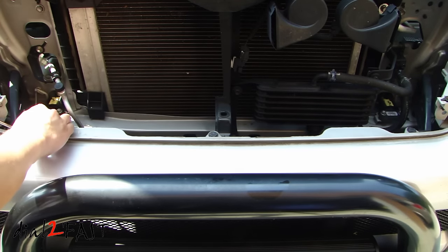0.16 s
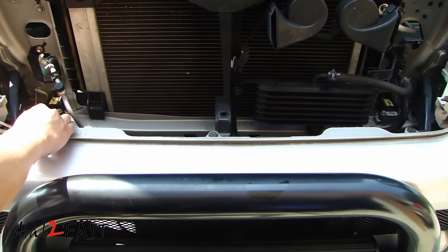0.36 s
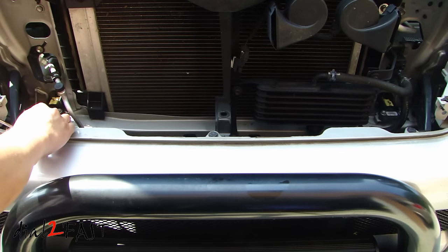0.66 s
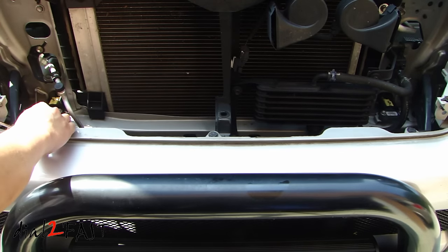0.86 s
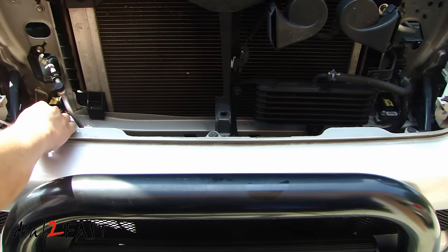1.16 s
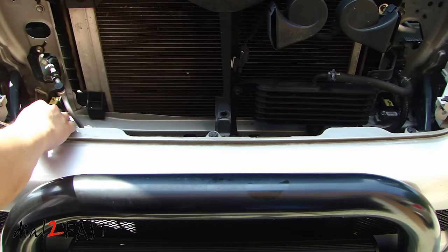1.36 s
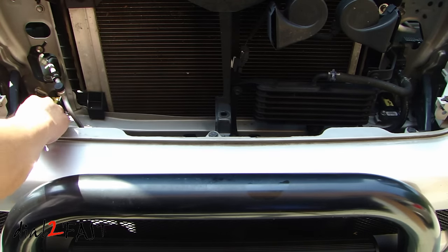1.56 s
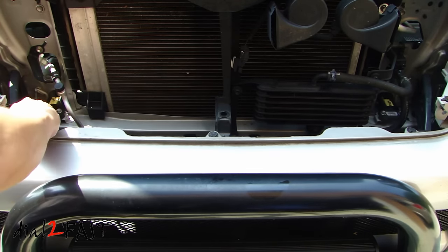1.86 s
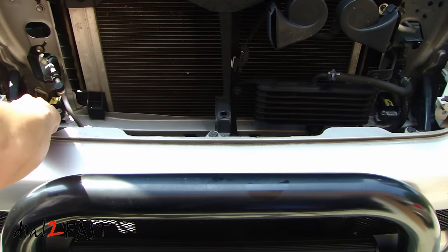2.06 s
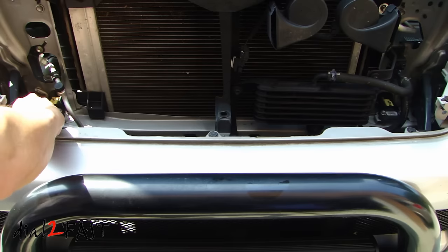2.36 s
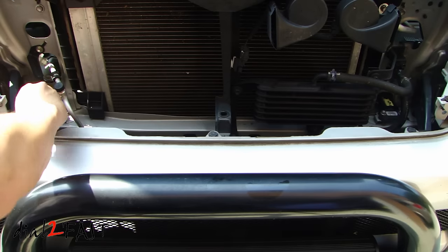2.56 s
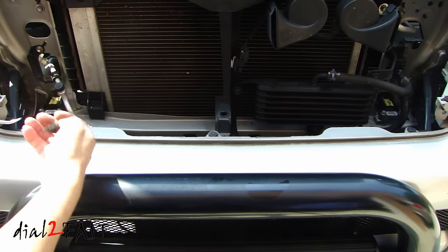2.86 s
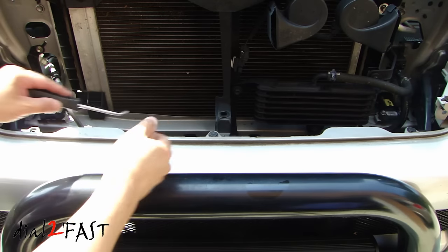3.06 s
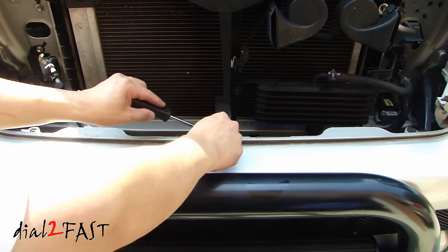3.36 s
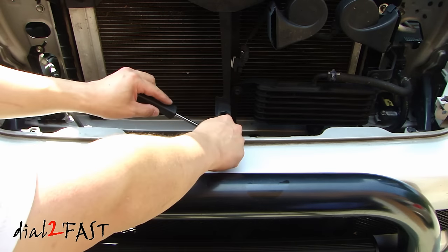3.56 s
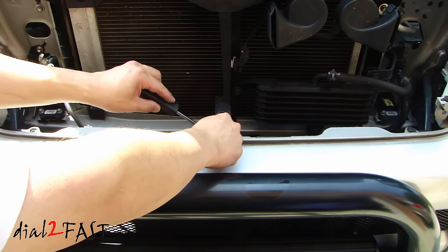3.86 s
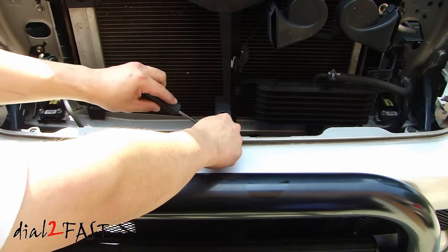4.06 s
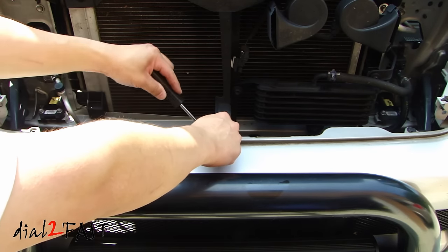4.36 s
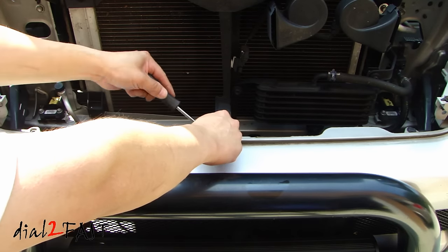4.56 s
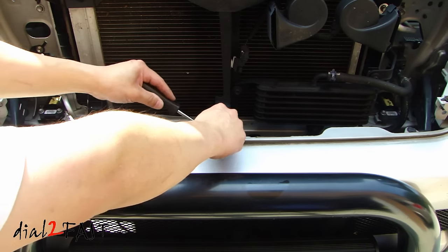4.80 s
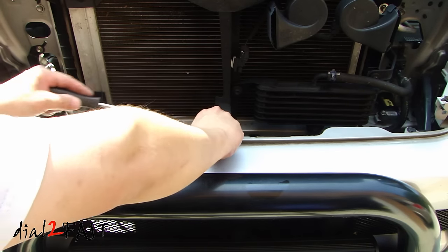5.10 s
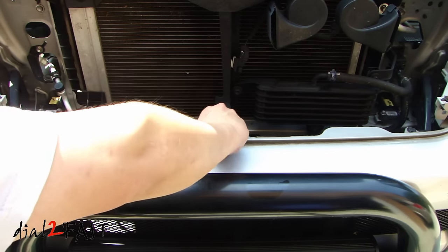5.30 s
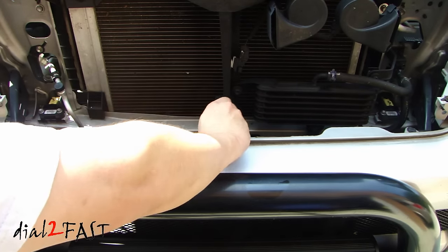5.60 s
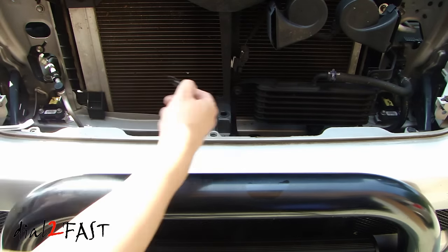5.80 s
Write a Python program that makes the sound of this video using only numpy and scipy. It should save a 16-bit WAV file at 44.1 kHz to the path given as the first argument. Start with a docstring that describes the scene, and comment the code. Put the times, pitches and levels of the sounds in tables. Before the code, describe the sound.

A hand tool clicks and scrapes at plastic clips on a car front. One bright snap with a thin metal ring comes early, rapid dull knocks cluster around two and a half seconds, then the two loudest blows land past four seconds before small rattles and a final scrape. Nearby microphone, thin bass, faint air noise.

```python
"""Plastic push-pin fasteners are pried from a car's bumper cover with a screwdriver, close under a stereo camera.
Filtered noise makes a steady outdoor hush and a faint 66 Hz waver throughout; every 0.98 s the level dips briefly.
Noise bursts scrape and knock through the hollow cover's resonances, echoing in the engine bay; spikes crack.
From 1.1 s a sine rings as the steel frame, from 2 s faint chirps and ticks pass, and after 3 s the work
moves to the near fastener, with its loudest blows at 4.3 and 4.6 s; then knocks and scrapes thin out."""
import sys
import numpy as np
from scipy import signal
from scipy.fft import rfft, irfft, next_fast_len
from scipy.io import wavfile
from scipy.ndimage import uniform_filter1d

SR = 44100
rng = np.random.default_rng(int(sys.argv[2]) if len(sys.argv) > 2 else 0)


def transcribe(signal):
    """Save signal, clipped to [-1, 1], as a 16-bit WAV file at the path in sys.argv[1]."""
    frames = np.atleast_2d(signal).T
    limited = np.clip(frames, -1, 1)
    pcm = np.round(limited * 32767).astype(np.int16)
    wavfile.write(sys.argv[1], SR, pcm)


N = 261865


def amp(db):
    """Amplitude factor of a level in dB."""
    return 10 ** (np.asarray(db) / 20)


def unit(x):
    """x scaled to an RMS of 1."""
    return x / np.sqrt(np.mean(x ** 2) + 1e-20)


def along(points, hz):
    """Interpolates (frequency [Hz], value) points on a log frequency axis."""
    point_hz, value = np.transpose(points)
    return np.interp(np.log(hz + 1), np.log(point_hz + 1), value)


def filtered(x, response):
    """x times a complex response of frequency; zero padding holds the tail."""
    size = next_fast_len(x.shape[-1] + 8192)
    spectrum = rfft(x, size) * response(np.fft.rfftfreq(size, 1 / SR))
    return irfft(spectrum, size)[..., :x.shape[-1]]


def mode(f, hz, width_hz):
    """One causal resonance, gain 1 at its peak."""
    return 1j * f * width_hz / (hz * hz - f * f + 1j * f * width_hz)


def add(track, s, sound):
    """Mixes a stereo sound in at time s."""
    part = track[:, max(round(s * SR), 0):][:, :sound.shape[1]]
    part += sound[:, :part.shape[1]]


# left-right likeness of noise: (frequency [Hz], correlation [-1..1])
LIKENESS = [(60, -0.81), (170, 1), (510, 0.95), (1470, 0.42), (4270, 0.04), (12400, 0.25)]


def pair(length):
    """Stereo white noise: opposed in the deepest bass, alike above it, nearly unrelated in the treble."""
    def mid_side_gains(hz):
        angle = np.arccos(np.clip(along(LIKENESS, hz), -1, 1)) / 2
        return np.array([np.cos(angle), np.sin(angle)])

    mid, side = filtered(rng.standard_normal((2, length)), mid_side_gains)
    return np.array([mid + side, mid - side])


# spectral shape of the hush, middle: (frequency [Hz], relative density [dB per Hz])
HUSH_MID = [(24, -48), (40, 2), (91, -12), (124, -8), (276, -1), (327, -4), (480, 0.5), (597, -2),
            (707, -1), (837, -2), (944, -3), (1810, -8), (1950, -7.5), (9130, -21), (12800, -24),
            (16600, -62), (22000, -120)]
# spectral shape of the hush, side: (frequency [Hz], relative density [dB per Hz])
HUSH_SIDE = [(15, -76), (25, -40), (85, -16), (117, -11.5), (269, -3), (420, -1.5), (622, -0.5), (672, -8),
             (807, 1.5), (873, -4), (1550, -6), (9410, -25.5), (12900, -29), (16700, -69), (22000, -120)]
# course of the hush's middle: (time [s], level [dB])
HUSH_LEVEL = [(0.0, -48), (0.61, -52.5), (2.51, -50), (2.71, -52), (4.38, -51.5), (4.51, -49.5),
              (5.93, -52)]


def hush():
    """Outdoor air and far traffic: slightly patchy noise whose side outweighs the middle."""
    z = signal.stft(rng.standard_normal((2, N + 512)), nperseg=512)[2]
    patches = uniform_filter1d(rng.standard_normal(z.shape[1:]), size=6, axis=0)
    patches = uniform_filter1d(patches, size=10, axis=1)
    patch_db = 1.0 * unit(patches)
    noise = signal.istft(z * amp(patch_db), nperseg=512)[1][:, :N]
    mid, side = filtered(noise, lambda hz: amp([along(HUSH_MID, hz), along(HUSH_SIDE, hz)]))
    mid, side = unit(mid), amp(4.0) * unit(side)
    s, db = np.transpose(HUSH_LEVEL)
    level = amp(np.interp(np.arange(N) / SR, s, db))
    return level * np.array([mid + side, mid - side])


# low waver: (frequency [Hz], width of each of two passes [Hz], level [dB])
HUM = (66, 2.6, -65)


def hum():
    """A faint low tone: noise through a narrow resonance twice, so it wavers; partly alike on both sides."""
    hz, width_hz, db = HUM
    shared, spread = filtered(rng.standard_normal((2, N)), lambda f: mode(f, hz, width_hz) ** 2)
    return amp(db) * unit(np.array([shared + 0.54 * spread, shared - 1.0 * spread]))


# modes of the hollow cover: (frequency [Hz], width [Hz], mean strength [dB])
COVER_MODES = [(240, 46, 3), (399, 73, 2.5), (570, 220, -13), (725, 15, -0.5), (896, 38, -0.5),
               (953, 134, -0.5), (1040, 80, -5.5), (1466, 116, 2), (2250, 1400, -10), (2514, 59, 6),
               (2800, 870, -10.5), (3600, 88, 4), (4350, 1600, -8)]
# sound that passes the modes: (frequency [Hz], level [dB])
PAST_MODES = [(100, -8), (300, -3), (1000, -10), (3000, -12.5), (6000, 0.5), (13000, 3.5)]


def cover(f):
    """The hollow cover's modes in alternating sign, strengths drawn anew each call, plus what passes them."""
    offsets_db = rng.normal(0, 2, len(COVER_MODES))
    response = amp(along(PAST_MODES, f))
    for k, ((hz, width_hz, db), offset_db) in enumerate(zip(COVER_MODES, offsets_db)):
        response = response + (-1) ** k * amp(db + offset_db) * mode(f, hz, width_hz)
    return response


# blade and pin strokes: (time of peak [s], fade time [s], level [dB], brightest frequency [Hz],
#                         treble against the brightest [dB])
SCRAPES = [(0.052, 0.0085, -42.5, 3500, -13), (0.19, .012, -45.5, 3870, -10),
           (1.332, .014, -35.5, 3120, -12.5), (1.855, 0.013, -38, 3520, -14.5),
           (2.042, 0.0078, -45, 4500, -17), (2.487, 0.024, -44.5, 2600, -3),
           (2.575, 0.017, -39.5, 3640, -11), (2.6, 0.01, -50.5, 5500, 0), (3.318, .002, -38, 3330, -17),
           (3.331, .003, -38, 1500, -17), (4.79, 0.033, -41, 2460, -11), (5.091, 0.012, -56.5, 5000, 4),
           (5.327, 0.0088, -46.5, 3460, -16), (5.42, 0.027, -48.5, 4430, -9),
           (5.596, .026, -31.5, 1970, -3)]
SWELL_SHARE = .7  # swell time / fade time
CATCHES_PER_S, CATCH_SIZE = 800, 2.5  # blade catches; size added, in multiples of the grit


def scrapes():
    """Dense grit and catches under a stroke that swells and fades; the cover colours it."""
    track = np.zeros((2, N))
    for s, fade_s, db, hz, treble_db in SCRAPES:
        swell_s = SWELL_SHARE * fade_s
        t = np.arange(round(-3 * swell_s * SR), round(6 * fade_s * SR)) / SR
        stroke = np.where(t < 0, np.exp(-(t / swell_s) ** 2), np.exp(-np.abs(t) / fade_s))
        lumps_db = 0.97 * unit(uniform_filter1d(rng.standard_normal(len(t)), size=60))
        catches = rng.random(len(t)) < CATCHES_PER_S / SR
        grit = pair(len(t)) * amp(lumps_db) * (1 + CATCH_SIZE * catches)
        colour = [(300, -14), (1200, -8), (hz, 0), (hz * 1.63, treble_db), (13000, treble_db - 15.5)]
        scrape = unit(filtered(grit, lambda f: cover(f) * amp(along(colour, f))))
        add(track, s + t[0], amp(db) * stroke * scrape)
    return track


# reverberation: (frequency [Hz], t60 [s])
BAY_T60 = [(150, 0.54), (800, 0.33), (3000, 0.27), (10000, 0.17)]


def bay(x):
    """Engine bay and garage: each frequency dies at its own speed, a new tail for each third of a second."""
    wet, step, delay_s = np.zeros((2, N)), SR // 3, .006
    for start in range(0, N, step):
        hz, t, z = signal.stft(pair(SR // 2), SR, nperseg=256)
        decay = amp(-60 * t / along(BAY_T60, hz)[:, None])
        tail = signal.istft(z * decay, SR, nperseg=256)[1]
        tail = tail / np.linalg.norm(tail[0])
        add(wet, start / SR + delay_s, signal.fftconvolve(x[:, start:start + step], tail, axes=1))
    return wet


# knocks and snaps: (time [s], level [dB], patch under the blade [Hz], pin [Hz], bass [dB],
#                    sharpness as mids [dB], chatter t60 [s])
KNOCKS = [(.187, -27.5, 780, 3460, 1, -33, 0.12), (.208, -26.5, 535, 2620, -14, -30.5, 0.1),
          (0.387, -38.5, 470, 2250, -21, -25, 0.12), (.926, -29, 550, 2100, -13, -27, .034),
          (0.94, -38, 565, 3440, -16, -17.5, 0.11), (1.091, -11.5, 738, 3540, -34, -5.5, 0.066),
          (1.109, -17, 1026, 3700, -29, -8.5, 0.097), (1.171, -25, 720, 3660, -5, -13, 0.14),
          (1.183, -28, 563, 3600, -9, -38.5, 0.072), (1.304, -27, 413, 2050, -6, -8.5, .12),
          (1.319, -18, 790, 3020, -25, -14, 0.046), (1.569, -34.5, 674, 2050, -23, -28, 0.087),
          (1.727, -33, 704, 1870, -35, -13.5, 0.089), (1.737, -34.5, 564, 2420, -1, -16, 0.14),
          (1.832, -35, 670, 3180, -21, -10, 0.13), (1.851, -29.5, 733, 2720, -10.5, -13, 0.14),
          (1.991, -33, 534, 2750, -3, -29, 0.14), (2.036, -32, 604, 2700, -20, -18, 0.078),
          (2.098, -29.5, 494, 2640, -9, -17, 0.099), (2.184, -36, 770, 2340, -23, -14, 0.054),
          (2.225, -31, 760, 2320, -35, -21, 0.23), (2.248, -25.5, 744, 2000, -26, -21.5, 0.078),
          (2.331, -28.5, 735, 2500, -26, -24, 0.049), (2.375, -24, 746, 1970, -33, -24, .063),
          (2.459, -30, 525, 1970, -35, -23.5, 0.12), (2.476, -23.5, 630, 2430, -8, -23, 0.096),
          (2.494, -21, 587, 2400, -12, -20.5, 0.095), (2.519, -28.5, 573, 1900, -5, -30, 0.16),
          (2.545, -28, 725, 2480, -25, -13.5, 0.3), (3.682, -24.5, 475, 2490, -11, -20, 0.062),
          (3.694, -31.5, 428, 2050, -6, -17.5, 0.046), (3.727, -37.5, 910, 2130, -9, -24, 0.1),
          (3.98, -22, 415, 2630, -25, -20.5, 0.097), (4.338, -7, 960, 2520, -16, -11, 0.1),
          (4.389, -22.5, 870, 2800, -34, -17, 0.12), (4.408, -23.5, 910, 2720, 6.5, -7.5, 0.053),
          (4.612, -7.5, 810, 2760, -27, -11, 0.091), (4.634, -16, 1080, 4300, -4, -4.5, 0.044),
          (4.659, -28.5, 860, 2100, -28, -9.5, 0.21), (4.716, -29.5, 776, 2300, -30, -17.5, 0.2),
          (4.77, -33.5, 650, 2100, -35, -12.5, .16), (4.781, -26.5, 780, 2725, -37, -22, 0.086),
          (4.909, -37.5, 543, 2710, -20, -10, 0.2), (5.028, -36, 654, 2120, -27, -17, 0.11),
          (5.318, -34, 654, 3600, -31, -10.5, 0.15), (5.405, -29, 503, 2580, -13, -12, 0.16),
          (5.583, -31.5, 610, 2000, -33, -14, 0.18)]
PIN_DB = 1.5  # pin ring
RISE_S, SOFT_RISE_S_PER_DB = .0008, .00005  # chatter onset; added per dB of lost sharpness
# treble and air at 0 dB mids: (far fastener, near fastener under the camera)
TREBLE_DB, AIR_DB = (-9.5, -5.5), (-25, -8.5)
STEEPER = 1.5  # dB of treble and air per dB of mids
MOVE_S = 3  # hands go to the near fastener


def knocks():
    """Each blow strikes the patch under the blade and the pin, then chatters on through the whole cover."""
    track, lead = np.zeros((2, N)), 64
    t = np.arange(-lead, SR // 4) / SR
    after = np.maximum(t, 0)
    for s, db, patch_hz, pin_hz, bass_db, mid_db, t60 in KNOCKS:
        rise_s = RISE_S + SOFT_RISE_S_PER_DB * max(-mid_db, 0)
        # rebounds a few ms apart
        lumps_db = 2.65 * unit(uniform_filter1d(rng.standard_normal(len(t)), size=90))
        envelope = amp(-60 * after / t60) * (1 - np.exp(-after / rise_s))
        chatter = pair(len(t)) * amp(lumps_db) * envelope
        strike = amp(25.0) * (np.arange(len(t)) == lead + round(rise_s * SR))

        near = int(s > MOVE_S)
        treble_db = TREBLE_DB[near] + STEEPER * mid_db
        air_db = AIR_DB[near] + STEEPER * mid_db
        tilt = [(150, bass_db), (400, 0), (1200, 0), (1900, mid_db), (3800, mid_db),
                (5800, treble_db), (10000, air_db)]

        def spot(f):
            patch = 1.145 * mode(f, patch_hz, 82)
            pin = amp(PIN_DB) * mode(f, pin_hz, 184)
            return (patch + pin) * amp(along(tilt, f))

        blow = filtered(chatter + strike, spot)
        blow = blow + filtered(chatter, lambda f: cover(f) * amp(along(tilt, f)))
        # level is set 9.5 dB above the loudest 9 ms RMS
        loudest_rms = np.sqrt(np.max(uniform_filter1d(np.mean(blow ** 2, 0), size=400)))
        add(track, s - lead / SR, amp(db) * blow / (3 * loudest_rms))
    return track


# plastic letting go: (time [s], peak level [dB], time scale [s])
CRACKS = [(1.0955, -20, .0004), (1.3055, -30, .0006), (1.321, -26, .0004), (3.683, -28, .0006),
          (3.9815, -27, .0006), (5.4065, -28, .0005), (1.853, -36, .0001), (3.3165, -36, .0001),
          (3.3288, -35, .0001), (1.1735, -26, .0005), (1.1845, -25, .0005), (4.3905, -25, .0004),
          (4.4115, -23, .0004), (4.6147, -7, .00014)]


def cracks():
    """Plastic lets go: one pressure spike between two dips."""
    track, half = np.zeros((2, N)), 128
    for s, db, scale_s in CRACKS:
        u = np.arange(-half, half) / SR / scale_s
        spike = (1 - 2 * u ** 2) * np.exp(-u ** 2)
        add(track, s - half / SR, amp(db) * spike * np.ones((2, 1)))
    return track


# blows that reach the steel frame: (time [s], level [dB])
FRAME_BLOWS = [(1.1, -44), (2.485, -48), (2.562, -45.5), (4.345, -45), (4.62, -45)]
FRAME_HZ, FRAME_T60_S, FRAME_RISE_S = 1667, 0.54, 0.0016


def frame():
    """The steel frame answers some blows in one mode: a thin ring, slightly unsteady in phase."""
    track, t = np.zeros((2, N)), np.arange(SR // 2) / SR
    for s, db in FRAME_BLOWS:
        drift = .055 * np.cumsum(rng.standard_normal(len(t)))
        envelope = amp(db - 60 * t / FRAME_T60_S) * (1 - np.exp(-t / FRAME_RISE_S))
        ring = envelope * np.sin(2 * np.pi * FRAME_HZ * t + drift)
        add(track, s, ring * np.ones((2, 1)))
    return track


# chirps and ticks: (time [s], length [s], frequency [Hz], level [dB], left minus right [dB],
#                    roughness [0-1])
CHIRPS = [(2.0, .1, 2750, -56, 3, .4), (3.0, .012, 4600, -51, 2, .7), (3.0, .014, 5800, -53, 2, .9),
          (3.093, .018, 4200, -54, 2, .7), (3.87, .035, 2850, -57, 3, .4), (4.097, .06, 2751, -48, 6, .1)]


def chirps():
    """Short faint whistles and ticks, left of centre: sines under an arch; rough ones scatter in phase."""
    track = np.zeros((2, N))
    for s, length_s, hz, db, pan_db, rough in CHIRPS:
        t = np.arange(round(length_s * SR)) / SR
        drift = .15 * rough * np.cumsum(rng.standard_normal(len(t)))
        side_phase = np.array([[0], [1.3]])  # rad
        arch = np.sin(np.pi * t / length_s) ** .6
        tone = arch * np.sin(2 * np.pi * hz * t + drift + side_phase)
        side_db = db + np.array([[pan_db / 2], [-pan_db / 2]])
        add(track, s, amp(side_db) * tone)
    return track


def scene():
    """Work at the bumper, its echo in the bay, and the background."""
    background = hush() + hum()
    work = (scrapes() + knocks() + cracks() + frame()) * amp([[-.5], [.5]])  # 1 dB to the right
    return background + work + amp(-8.5) * bay(work) + chirps()


# microphone response: (frequency [Hz], level [dB])
MIC = [(30, -40), (90, -6.5), (160, 0), (11500, -3), (12300, -10.5), (12900, -17)]
GAP_FIRST_S, GAP_EVERY_S, GAP_LENGTH_S, GAP_DB = .4777, .9815, .0026, -13
TOP_HZ = 12950


def record(dry):
    """Thin bass, a brief level dip at a steady interval, nothing above the band limit."""
    heard = filtered(dry, lambda hz: amp(along(MIC, hz)))
    since_gap_s = (np.arange(N) / SR - GAP_FIRST_S) % GAP_EVERY_S
    gain = np.where(since_gap_s > GAP_LENGTH_S, 1, amp(GAP_DB))
    return filtered(heard * gain, lambda hz: hz < TOP_HZ)


dry = scene()
out = record(dry)
transcribe(out)
```